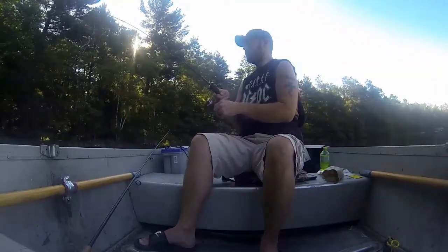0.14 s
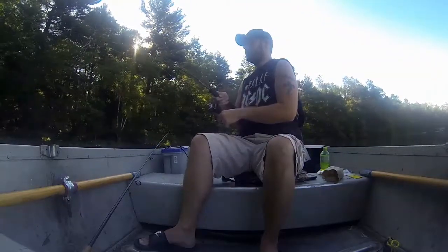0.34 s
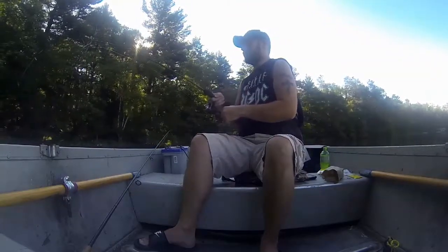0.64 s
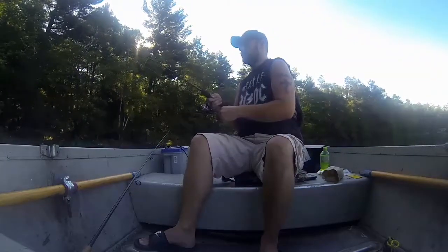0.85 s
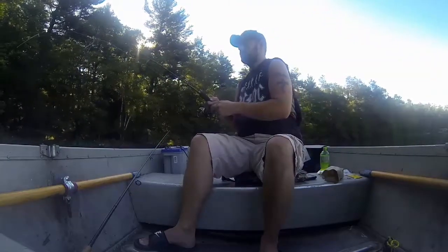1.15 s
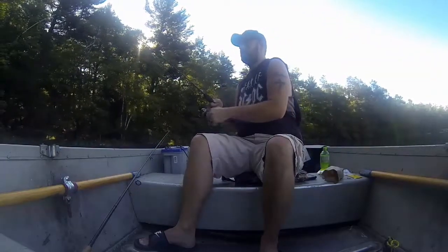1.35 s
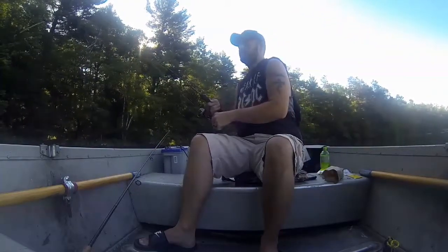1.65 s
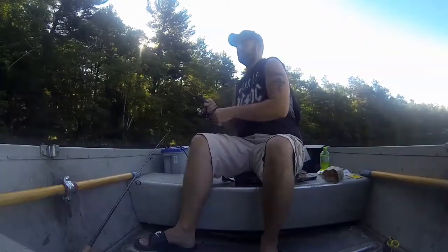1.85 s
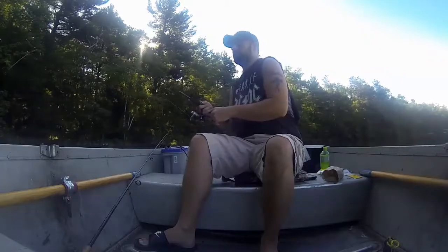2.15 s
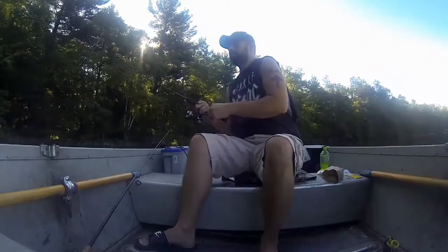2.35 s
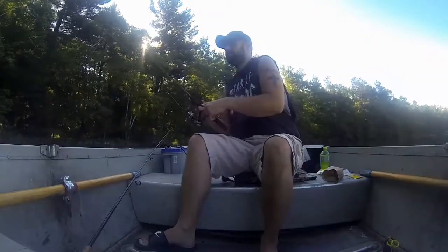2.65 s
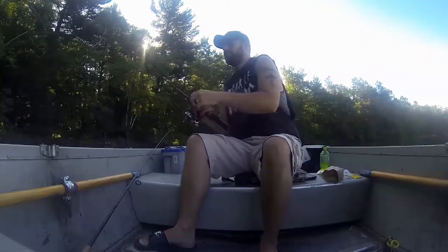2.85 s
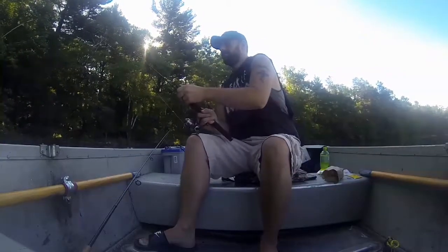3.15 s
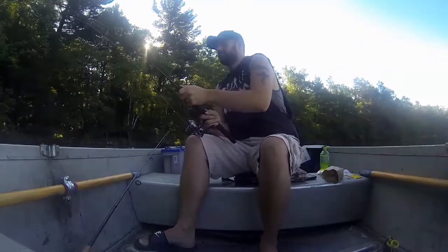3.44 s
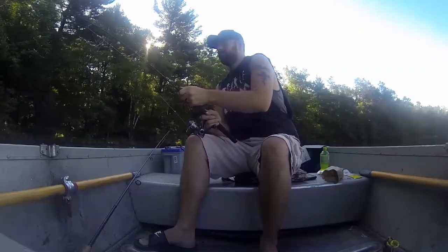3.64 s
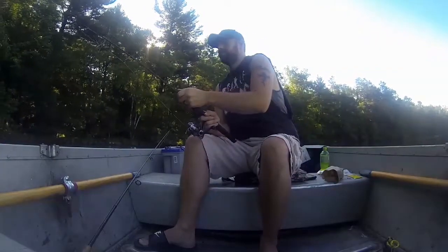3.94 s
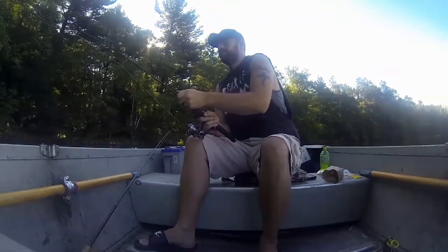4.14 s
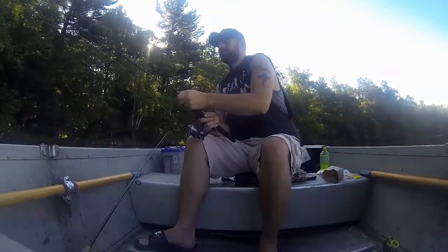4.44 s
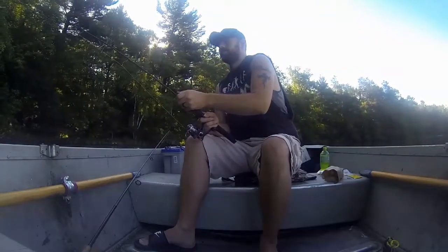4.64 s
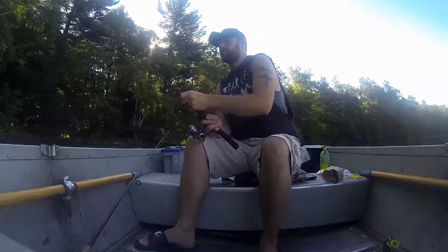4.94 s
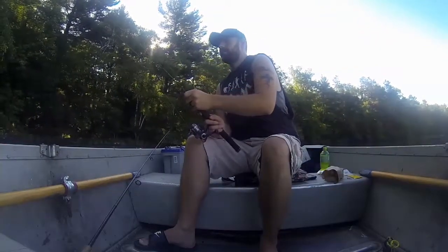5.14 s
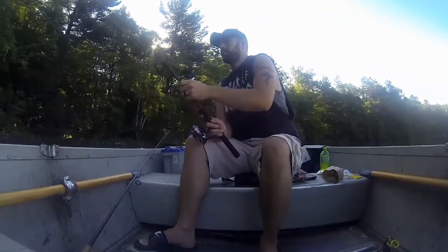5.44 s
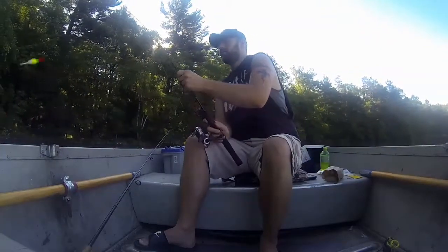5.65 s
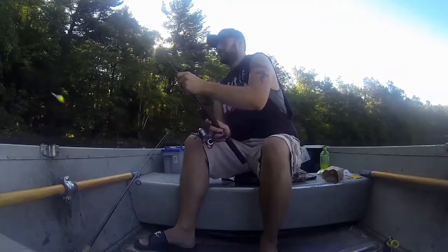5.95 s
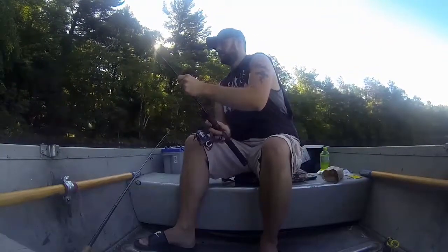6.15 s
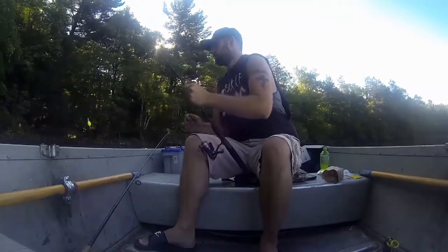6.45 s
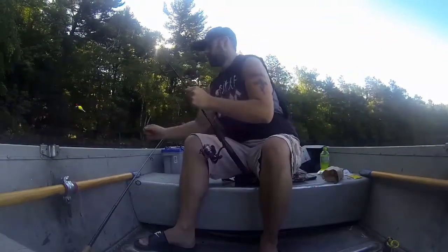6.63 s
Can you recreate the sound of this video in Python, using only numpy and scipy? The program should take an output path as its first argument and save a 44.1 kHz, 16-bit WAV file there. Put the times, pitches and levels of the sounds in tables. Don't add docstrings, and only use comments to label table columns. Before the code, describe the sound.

Close to a microphone resting on a metal boat, a faint bird whistles over hiss while tackle ticks lightly. Two firm knocks ring the hull, a quieter pause follows, then a loud sharp blow starts a busy stretch of thuds, rubbing, rattles and small watery gurgles. A bright rap follows, then calm, then a rapid cluster of crisp reel clicks fading to small clinks on an open calm lake.

```python
import sys
import numpy as np
from scipy import signal
from scipy.fft import rfft, irfft
from scipy.io import wavfile
from scipy.ndimage import uniform_filter1d

SR = 44100
rng = np.random.default_rng(int(sys.argv[2]) if len(sys.argv) > 2 else 0)


def generate_wav(signal):
    frames = np.transpose(np.atleast_2d(signal))
    scaled = np.clip(frames, -1, 1) * 32767
    pcm = np.round(scaled).astype(np.int16)
    wavfile.write(sys.argv[1], SR, pcm)


def magnitude_from_level(level_db):
    exponent = np.asarray(level_db, float) / 20
    return 10 ** exponent


N = 299421


def evened(x):
    return x / np.sqrt(np.mean(x ** 2) + 1e-20)


def read(points, hz):
    f, value = np.transpose(points)
    return np.interp(np.log(hz + 1), np.log(f + 1), value)


def add(mix, s, sound):
    part = mix[max(round(s * SR), 0):][:len(sound)]
    part += sound[:len(part)]


def colour(x, gain_db):
    return irfft(rfft(x) * magnitude_from_level(gain_db(np.fft.rfftfreq(len(x), 1 / SR))), len(x))


def grain_levels(spread_db, most, count):
    return magnitude_from_level(spread_db * np.minimum(rng.exponential(1, count), most))


def stir(index):
    # (time [s], hold [s], gurgle [dB], spray and rustle [dB], hull rumble [dB])
    moves = [(0.157, 0.19, -68.5, -62, -64.5), (1.007, 0.41, -78.5, -75, -78), (1.7, 0.21, -72.5, -78, -54),
             (2.45, 0.33, -72.5, -91, -68), (2.817, 0.076, -60.5, -72, -48),
             (3.006, 0.069, -57.5, -58, -53), (3.183, 0.15, -50, -60.5, -42),
             (3.521, 0.037, -48, -64.5, -42), (3.859, 0.027, -52.5, -65.5, -55),
             (4.071, 0.094, -67, -61, -55), (4.214, 0.083, -52.5, -67, -47.5),
             (4.467, 0.082, -60.5, -90, -59), (4.76, 0.053, -65, -87, -71), (5.148, 0.097, -65.5, -71, -86),
             (5.568, 0.03, -48.5, -62.5, -77), (5.68, 0.08, -58, -57, -59), (6.013, 0.067, -60, -62.5, -63),
             (6.298, 0.16, -70, -63, -65.5), (6.554, 0.26, -78.5, -71.5, -68)]
    build_db_s, settle_db_s = [130, 71, 121][index], [80, 104, 51.5][index]
    rest_db = [-74.5, -84, -72.5][index]
    t = np.arange(0, N + 200, 100) / SR
    power = magnitude_from_level(2 * rest_db)
    for s, hold_s, *level_db in moves:
        early_s = np.maximum(s - t, 0)
        late_s = np.maximum(t - s - hold_s, 0)
        power = power + magnitude_from_level(2 * (level_db[index] - build_db_s * early_s - settle_db_s * late_s))
    return np.interp(np.arange(N) / SR, t, np.sqrt(power))


def knock(peak_db, boom_db, bright_db, rise_ms, ring=0.8):
    # (frequency [Hz], level [dB])
    strong_modes = [(88, 7), (136, 7.5), (232, 0), (348, 0), (480, -9.5), (580, -1.5), (660, -15),
                    (1050, -23)]
    # (frequency [Hz], t60 [s])
    ring_times = [(60, 0.72), (160, 0.77), (420, 0.64), (1100, 0.13), (2910, 0.16), (7680, 0.037)]
    t, luck = np.arange(SR // 2) / SR, rng.random((3, 78))
    hz = np.append(np.geomspace(75, 3600, num=70), [f for f, _ in strong_modes])
    hz = hz * (.96 + .08 * luck[0])
    tilt = [(100, boom_db), (200, 1), (550, 0.2 * bright_db + 2.0),
            (1400, bright_db + 12.0), (3600, bright_db - 9.5)]
    db = np.append(np.full(70, -8.), [level for _, level in strong_modes])
    db = db - 7 * luck[1] + read(tilt, hz)
    rise = 1 - np.exp(-(t + 1e-6) * 1000 / rise_ms * hz[:, None] / 300)
    slow = magnitude_from_level(-60 * t / (ring * read(ring_times, hz)[:, None]))
    fall = .7 * slow + .6 * slow ** 2.5
    body = magnitude_from_level(db) @ (rise * fall * np.sin(2 * np.pi * (hz[:, None] * t + luck[2][:, None])))
    body = .5 * body / abs(body).max()
    thud = -np.sin(2 * np.pi * 225 * t) * t / .003 * np.exp(1 - t / .003)
    dent = np.clip(-bright_db / 24 - .1, 0, 1)
    return magnitude_from_level(peak_db) * (body * (1 - dent * np.exp(-(t / .005) ** 2)) + 1.15 * dent * thud)


def knocks():
    # (time [s], peak [dB], boom [dB], brightness [dB], rise [ms])
    blows = [
        (1.4746, -20, -7, -14.5, 1.9),
        (1.641, -22, 8.5, -7.5, 31),
        (2.544, -38, 25, -10.5, 2.9),
        (2.7994, -21.5, -1.5, -38, 3.3),
        (3.0904, -8, -2.5, -21, 0.73),
        (3.498, -25, -16, -57, 4.5),
        (4.195, -16.5, -20, 2, 0.48),
        (5.531, -30, -39, 24, 1.7),
    ]
    out = np.zeros(N)
    for s, *blow in blows:
        add(out, s, knock(*blow))
    return out


def tick(peak_db, hz, top_db=-40, t60_s=0.14, steep_db=13.5):
    rasp_db = [(3000, -26.5), (7000, -26.5), (11000, -19.5), (14000, -25.0), (16000, -36)]
    t, noise = np.arange(6000) / SR, rng.standard_normal((3, 6000))
    ring = evened(colour(noise[0], lambda f: -steep_db * abs(np.log2((f + 1) / hz))))
    rasp = evened(colour(noise[1], lambda f: read(rasp_db, f)))
    rise = (1 - np.exp(-t / .0011)) ** 2
    uneven = magnitude_from_level(2.5 * np.clip(evened(uniform_filter1d(noise[2], size=40)), -3, 1.5))
    fall = magnitude_from_level(-60 * t / t60_s) + 0.16 * magnitude_from_level(-60 * t / 0.086)
    return magnitude_from_level(peak_db - 16.0) * (ring + magnitude_from_level(top_db) * rasp) * uneven * rise * fall


def tackle():
    # (time [s], peak [dB], ring [Hz], top band [dB])
    reel_clicks = [(5.4757, -30.5, 4500, -25), (5.516, -16, 5060, -33), (5.532, -20.5, 5960, -22),
                   (5.559, -23.5, 5660, -16), (5.619, -25.5, 3700, 6.5), (5.633, -19, 6000, -1.5),
                   (5.671, -32.5, 4890, -3), (5.6924, -40.5, 3200, 14.5), (5.7115, -27.5, 7800, -2),
                   (5.729, -30, 7000, 0), (5.745, -30, 6350, -17), (5.7862, -28, 6600, -0.5),
                   (5.814, -40, 5630, -3), (5.9674, -36.5, 5100, -6), (5.987, -30.5, 5530, -6),
                   (6.023, -31.5, 5500, -12)]
    # (time [s], peak [dB], ring [Hz], top band [dB])
    line_ticks = [(0.043, -34, 4080, -29), (0.158, -58, 4110, -24), (0.2114, -46, 3310, -21),
                  (0.334, -40, 3750, -20), (1.4749, -26.5, 1800, -16), (1.6393, -13.5, 5400, 8.5),
                  (1.925, -55, 3150, 10), (2.05, -52, 2920, -18), (2.314, -58, 2520, 14.5),
                  (2.781, -43, 5360, 7.5), (2.8427, -38, 5400, -12), (2.893, -62, 2630, 18.5),
                  (2.946, -41, 3030, 2), (2.9642, -38.5, 2680, 6), (3.035, -45, 3500, 4),
                  (3.1035, -34.5, 2530, -4), (3.1182, -22, 5100, -13), (3.2018, -38, 2440, -7),
                  (3.34, -46.5, 3100, 6), (3.441, -48, 2650, 5.5), (3.564, -49, 2490, 12.5),
                  (3.722, -42.5, 3960, 1), (3.8016, -38.5, 4900, -5), (3.902, -47.5, 2700, 6.5),
                  (3.934, -41, 3860, 0), (4.022, -30.5, 2440, -12), (4.119, -43, 2700, -14),
                  (4.1952, -23.5, 4560, -2.5), (4.564, -43.5, 4690, -4), (6.4294, -58, 3290, 0)]
    # (time [s], peak [dB], ring [Hz])
    rod_taps = [(0.078, -39.5, 784), (2.658, -48, 740), (2.912, -55, 1060), (3.065, -33, 848),
                (3.13, -28, 1070), (3.165, -39, 837), (3.2, -31.5, 864), (3.282, -42, 945),
                (3.443, -34, 1000), (3.506, -50, 864), (3.57, -30, 760), (3.7, -34.5, 675),
                (3.963, -41, 1450), (4.104, -33, 890), (4.27, -53, 810), (4.324, -51, 853),
                (5.451, -40, 705), (5.585, -30, 1050), (5.792, -50, 931), (5.939, -47, 734),
                (6.158, -35, 870)]
    lead_s, reel_t60_s, tick_cycles = .0015, 0.027, 187
    out = np.zeros(N)
    for s, *click in reel_clicks:
        add(out, s - lead_s, tick(*click, reel_t60_s))
    for s, db, hz, top_db in line_ticks:
        add(out, s - lead_s, tick(db, hz, top_db, tick_cycles / hz))
    for s, *tap in rod_taps:
        add(out, s - lead_s, tick(*tap))
    return out


def clink(peak_db, hz, t60_ms, spread=0.0904, rise_cycles=1.0, scatter=0.38):
    t, luck = np.arange(int(t60_ms / 1000 * SR) + 9) / SR, rng.random((2, 7, 1))
    mode_hz = hz * (1 + spread * (2 * luck[0] - 1))
    modes = np.sin(2 * np.pi * (mode_hz * t + scatter * luck[1])).sum(0) / 4
    return magnitude_from_level(peak_db - 60000 * t / t60_ms) * (1 - np.exp(-t * hz / rise_cycles)) * modes


def rattle():
    # (time [s], peak [dB], frequency [Hz], t60 [ms])
    small_parts = [(0.033, -42, 1730, 34), (0.037, -43, 2210, 52), (0.043, -52, 5800, 30),
                   (0.044, -48, 4520, 30), (0.158, -53, 4100, 30), (0.212, -58, 3350, 50),
                   (0.33, -54, 2600, 40), (2.966, -36, 2010, 50), (2.971, -41, 1480, 50),
                   (3.103, -51, 2900, 50), (3.13, -38, 4430, 30), (3.131, -30, 1170, 40),
                   (3.165, -41, 1580, 30), (3.202, -44.5, 2410, 93), (3.299, -46, 2440, 65),
                   (3.122, -40, 1900, 25), (3.21, -49.5, 5060, 60), (3.323, -48, 1440, 69),
                   (3.34, -48, 5200, 30), (3.563, -52, 5350, 25), (3.738, -47, 1300, 70),
                   (3.345, -59, 3050, 35), (3.443, -53, 1900, 69), (3.453, -57, 2680, 40),
                   (3.505, -49, 980, 50), (3.571, -40.5, 1700, 50), (3.59, -49, 2580, 50),
                   (3.614, -47, 1800, 70), (3.616, -53, 2600, 60), (3.701, -50, 1510, 26),
                   (3.723, -46, 3940, 22), (3.803, -53, 4660, 25), (3.817, -52, 5200, 30),
                   (3.82, -52, 1510, 60), (3.867, -46, 1580, 60), (3.901, -52, 2670, 50),
                   (3.934, -51, 3900, 30), (3.959, -51, 1710, 70), (3.972, -55, 3760, 25),
                   (3.994, -51, 4300, 25), (4.078, -51, 1000, 60),
                   (5.463, -49, 5200, 44), (5.508, -47, 4600, 27), (5.585, -35, 1140, 50),
                  (5.712, -48, 1800, 46), (5.797, -53, 970, 50), (5.938, -48, 2000, 45),
                  (5.966, -56, 3400, 25), (5.974, -46, 5130, 33), (6.04, -49.5, 1304, 57),
                  (6.092, -55, 3900, 30), (6.11, -58, 1900, 40), (6.128, -53, 4430, 34),
                  (6.144, -51, 2300, 28), (6.159, -51, 2080, 30), (6.17, -53, 2520, 30),
                  (6.218, -55, 4200, 120), (6.324, -50, 2180, 30), (6.334, -54, 3170, 87),
                  (6.427, -48, 850, 55), (6.437, -49, 1580, 33), (6.459, -57, 2480, 30),
                  (5.59, -52, 2390, 60), (5.62, -41, 1100, 50), (5.724, -54, 986, 90),
                  (6.03, -53, 1910, 60), (6.375, -52, 1190, 50)]
    # (time [s], peak [dB], frequency [Hz], t60
    # [ms])
    hull_panels = [(1.476, -30.5, 640, 140), (1.484, -30.5, 287, 180), (1.66, -35, 310, 240),
                   (3.091, -21.5, 665, 84), (3.092, -35, 1430, 50), (3.105, -16, 160, 160),
                   (3.093, -24, 610, 140), (2.8017, -32.5, 190, 220), (4.197, -27, 980, 140),
                   (4.14, -34.5, 270, 210), (5.54, -44, 1500, 150), (4.215, -25.5, 492, 115),
                   (4.323, -46, 650, 440), (4.43, -52, 670, 170), (3.1, -27, 760, 54),
                   (3.277, -45, 1000, 90), (4.68, -59, 980, 60), (4.2, -56, 620, 80), (4.82, -60, 2500, 40),
                   (4.85, -59, 1570, 80), (0.09, -54, 1500, 80), (0.29, -53, 1300, 54),
                   (5.452, -48, 800, 40), (5.471, -42, 600, 40), (3.508, -50, 1420, 40),
                   (2.806, -41, 950, 66), (2.815, -33.5, 390, 170), (2.857, -35.5, 230, 120),
                   (2.846, -50.5, 1800, 50), (3.2, -52, 1400, 25), (2.911, -48, 1050, 41),
                   (1.698, -37, 265, 230), (3.101, -24, 390, 110), (4.198, -38, 2100, 90),
                   (2.655, -52.5, 1250, 40), (3.2, -42, 730, 50), (6.045, -55, 2300, 40),
                   (6.06, -50, 730, 50), (0.26, -58, 2600, 40), (1.476, -38, 2050, 100)]
    out = np.zeros(N)
    for s, *row in small_parts + hull_panels:
        add(out, s, clink(*row))
    return out


def boat(x, t60_s=0.077, wet_db=-2.0):
    t = np.arange(8000) / SR
    walls = rng.choice([-1., 0, 0, 0, 0, 0, 1.], 8000) * magnitude_from_level(-60 * t / t60_s) * (t > .002)
    return x + magnitude_from_level(wet_db) * signal.oaconvolve(x, walls / np.linalg.norm(walls))[:N]


def scrape(level_db=-6., per_s=700., spread_db=5.):
    # (frequency [Hz], level [dB per Hz])
    plate_colour = [(300, -32), (600, -0.5), (1000, 4), (1700, -5.5), (2600, -14.5), (4000, -28),
                    (8000, -36)]
    slips = (rng.random(N) < per_s / SR) * grain_levels(spread_db, 4, N) * rng.choice([-1., 1.], N)
    spot = rng.integers(0, 4, N // 1500 + 1).repeat(1500)[:N]
    rung = sum(boat(slips * (spot == k), t60_s=0.033, wet_db=2.0) for k in range(4))
    return evened(colour(rung, lambda f: read(plate_colour, f))) * stir(index=0) * magnitude_from_level(level_db)


def bubble(peak_db, hz, ms, glide):
    u = np.linspace(-1, 1, int(ms * 1.6 * SR / 1000) + 9)
    pitch_hz = hz * glide ** (1.09 * u)
    shape = np.cos(np.pi * u / 2) ** 2 * np.exp(-.3 * u)
    return magnitude_from_level(peak_db + 8.0) * shape * np.sin(2 * np.pi * np.cumsum(pitch_hz) / SR + 6 * rng.random())


def pockets():
    # (time [s], peak [dB], frequency [Hz], length [ms])
    glugs = [(3.434, -41.5, 223, 11.5), (3.46, -53, 260, 20), (3.504, -30.5, 244, 4.5),
             (3.524, -40, 353, 17.7), (3.574, -39.5, 325, 20), (3.586, -39, 474, 13), (3.606, -44, 482, 11),
             (3.622, -51, 510, 23), (3.642, -43.5, 240, 23), (3.672, -40, 300, 9),
             (3.708, -41.5, 175.5, 31), (3.885, -56, 430, 13.8), (4.157, -42.5, 305, 28),
             (4.33, -47, 543, 10), (4.4, -39.5, 249, 20.4), (4.416, -45.5, 372, 9.8),
             (5.13, -64, 603, 13.2), (5.22, -62, 626, 29), (5.474, -56, 548, 7.6), (5.532, -33, 644, 2.7),
             (5.576, -47, 240, 46), (5.591, -54, 625, 27), (5.655, -50.5, 342, 13.2),
             (5.693, -52.5, 496, 8.7)]
    # (time [s], peak [dB], frequency [Hz], length [ms])
    bubbles = [(0.037, -49.5, 1870, 3.1), (0.164, -48, 876, 13), (0.166, -49, 606, 8.9),
               (0.182, -44.5, 760, 10.6), (0.21, -58.5, 1005, 20), (0.247, -54, 733, 19),
               (0.255, -55.5, 880, 16.5), (0.281, -52, 965, 7.6), (0.369, -64, 2680, 11),
               (2.968, -52, 2030, 9.8), (2.97, -49, 1050, 8), (2.977, -50, 1470, 13.4),
               (3.302, -55, 786, 24), (3.572, -44, 687, 8), (3.734, -56, 1090, 7.5),
               (3.856, -53.5, 1057, 8.7), (3.857, -51, 716, 8.1), (3.929, -50.5, 854, 7.3),
               (4.026, -44, 1300, 3.5), (4.129, -51.5, 657, 9.2), (4.129, -38, 1116, 5.2),
               (4.438, -60.5, 830, 25), (4.74, -59.5, 1420, 5.6), (5.52, -41.5, 1286, 5.9),
               (5.548, -44.5, 1020, 5.6), (5.548, -50.5, 1395, 13), (5.601, -50.5, 1050, 8.2),
               (6.0, -51, 840, 8.1), (6.14, -60, 870, 11.3), (6.362, -60, 2530, 4.4)]
    # (time [s], peak [dB], frequency [Hz], length [ms])
    drips = [(0.218, -60.5, 1734, 6.7), (2.971, -61.5, 2400, 16), (3.289, -57, 904, 18),
             (3.512, -58.5, 1047, 24), (3.741, -57.5, 1447, 19.5), (4.57, -66, 660, 42),
             (4.845, -74, 800, 42), (5.476, -55.5, 1400, 12), (5.725, -60.5, 1002, 33),
             (6.076, -66, 1760, 11), (6.084, -58.5, 984, 19), (6.148, -65, 2000, 8), (6.16, -62, 2260, 7.2),
             (6.252, -60, 2500, 3.7), (6.366, -63, 1910, 20), (6.381, -63, 1094, 11.5),
             (6.449, -67, 1390, 50)]
    out = np.zeros(N)
    for rows, climb_per_ms in ((glugs, 0.0073), (bubbles, 0.0145), (drips, 0.00158)):
        for s, db, hz, ms in rows:
            sound = bubble(db, hz, ms, 1 + climb_per_ms * ms)
            add(out, s - len(sound) / 2 / SR, sound)
    return out


def gurgle(per_s=900., spread_db=4.5):
    size_levels = [(250, -2), (700, -2.0), (1200, -12.5), (2800, -48.5)]  # (Hz, dB)
    out = np.zeros(N)
    for hz in np.geomspace(250, 2800, num=30):
        train = 1. * (rng.random(N) < per_s / 30 / SR)
        levels = grain_levels(spread_db, 3, 400)
        train[train > 0] = levels[np.arange(int(train.sum())) % 400]
        grain = bubble(read(size_levels, hz), hz, 2500 / hz + 3, rng.uniform(0.825, 1.326))
        out += signal.oaconvolve(train, grain)[:N]
    steady = out / np.sqrt(uniform_filter1d(out ** 2, size=9000) + 1e-9)
    return steady * stir(index=0) * magnitude_from_level(1.0)


def spray(per_s=450.0, spread_db=3.2):
    # (frequency [Hz], level [dB per Hz])
    spray_colour = [(880, -13), (1500, -11), (2020, -15.5), (2590, -14), (11400, -21), (14800, -24),
                    (16000, -49)]
    train = (rng.random(N) < per_s / SR) * grain_levels(spread_db, 4, N)
    noise = colour(rng.standard_normal(N), lambda f: read(spray_colour, f))
    z = signal.stft(noise, nperseg=128)[2]
    grains = np.resize(train, z.T.shape).T
    grains = uniform_filter1d(uniform_filter1d(grains, size=15, axis=0), size=2, axis=1)
    crackle = signal.istft(z * (1 + 30 * grains), nperseg=128)[1][:N]
    return evened(crackle) * stir(index=1) * magnitude_from_level(1.0)


def rumble():
    modes_hz = (72.0, 90, 114.0, 153.4, 186.0, 211.0)

    def peaks_db(f):
        power = sum(1 / (1 + ((f - hz) / 12) ** 4) for hz in modes_hz)
        return 10 * np.log10(power + 1e-9) - f / 40

    murmur = colour(rng.standard_normal(N), peaks_db)
    return murmur / np.sqrt(uniform_filter1d(murmur ** 2, size=5000)) * stir(index=2) * magnitude_from_level(-1.5)


def whistle(db, start_hz, end_hz, length_s, bend=.3):
    u = np.linspace(0, 1, int(length_s * SR))
    pitch_hz = start_hz + (end_hz - start_hz) * ((1 + bend) * u - bend * u ** 2)
    shape = np.sqrt(abs(np.sin(np.pi * u ** 0.44)))
    return magnitude_from_level(db) * shape * np.sin(2 * np.pi * np.cumsum(pitch_hz) / SR)


def thrush(t60_s=1.7, flutter_db=4.5):
    # (time [s], level [dB], start [Hz], end [Hz], length [s])
    grace_notes = [
        (0.273, -68, 3520, 4820, 0.04),
        (0.548, -68, 5400, 4840, 0.018),
        (0.727, -69, 6080, 4870, 0.036),
        (0.827, -70.5, 4900, 6080, 0.036),
        (1.021, -66.5, 6170, 5270, 0.02),
        (1.114, -63.5, 4430, 5660, 0.016),
        (1.375, -68, 3850, 2600, 0.06),
        (6.62, -72, 5540, 3850, 0.055),
        (6.75, -68.5, 6220, 5880, 0.056),
    ]
    # (time [s], level [dB], start [Hz], end [Hz], length [s])
    squeaks = [
        (1.213, -71, 2880, 2420, 0.165),
        (1.265, -75, 1770, 1360, 0.15),
        (1.32, -74, 4560, 4400, 0.09),
        (3.047, -67, 3250, 2880, 0.055),
        (3.867, -73, 2930, 2450, 0.23),
        (4.395, -72, 1520, 1480, 0.07),
        (5.415, -73, 2570, 2620, 0.14),
    ]
    direct_db, echo_db = -2., 9.
    song, faint = np.zeros((2, N))
    whistles = [(0.019 + k * 0.2845, -68.5 + k * 1.3, 4900, 2900, 0.064) for k in range(5)]
    for s, *note in whistles + grace_notes:
        add(song, s, whistle(*note, bend=.6))
    for s, *note in squeaks:
        add(faint, s, whistle(*note, bend=0.095))
    t = np.arange(SR) / SR
    woods = rng.standard_normal(SR) * magnitude_from_level(-60 * t / t60_s) * (1 - np.exp(-t / 0.00082))
    flutter = magnitude_from_level(flutter_db * evened(uniform_filter1d(rng.standard_normal(N), size=250)) + 1.5)
    direct = (magnitude_from_level(direct_db) * song + magnitude_from_level(-1.0) * faint) * flutter
    echo = signal.oaconvolve(song + magnitude_from_level(-8.0) * faint, woods / np.linalg.norm(woods))[:N]
    return direct + magnitude_from_level(echo_db) * echo


def hiss(level_db=-55.5):
    # (frequency [Hz], level [dB per Hz])
    hiss_colour = [(15, 5), (40, -2.5), (87, -8.5), (256, -19.5), (500, -30), (800, -33), (1480, -31),
                   (2480, -35.5), (5000, -36), (14000, -39), (15200, -38.5), (16000, -46)]
    hz = np.fft.rfftfreq(1024, 1 / SR)
    a, b, patches = rng.standard_normal((N // 256 + 5, 513, 3)).T
    patches_db = evened(uniform_filter1d(uniform_filter1d(patches, size=10, axis=0), size=10, axis=1))
    z = (a + 1j * b) * magnitude_from_level(read(hiss_colour, hz)[:, None] + patches_db)
    return magnitude_from_level(level_db) * evened(signal.istft(z, nperseg=1024, noverlap=768)[1][:N])


def scene():
    handling = knocks() + tackle() + rattle() + scrape()
    water = boat(pockets()) + gurgle() + spray() + rumble()
    return (handling + water + thrush() + hiss())[None]


def band_limit(x):
    return signal.sosfilt(signal.butter(12, 15900, fs=SR, output="sos"), x)


def record(dry):
    # (frequency [Hz], threshold against the band's usual level [dB])
    gate_db = [(500, -40), (520, -5), (690, -5), (710, -40), (9000, -30), (10500, -2), (15050, -2),
               (15200, 9), (22050, 30)]
    kept = dry[0]
    for size, high in ((1024, False), (400, True)):
        hz, _, z = signal.stft(kept, SR, nperseg=size)
        level_db = 10 * np.log10(uniform_filter1d(abs(z) ** 2, size=5, axis=0) + 1e-20)
        threshold_db = np.median(level_db, axis=1) + read(gate_db, hz)
        quiet = (level_db < threshold_db[:, None]) & ((hz > 5000) == high)[:, None]
        muted = z / 10 * (hz < 15200)[:, None]
        kept = signal.istft(np.where(quiet, muted, z), SR, nperseg=size)[1][:N]
    offset = -.0187
    return band_limit(kept[None] + offset)


dry = scene()
out = record(dry)
generate_wav(out)
```